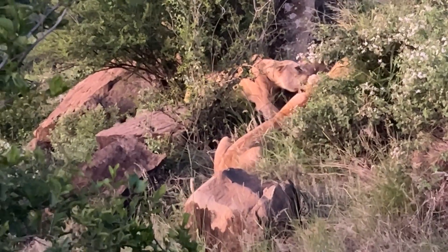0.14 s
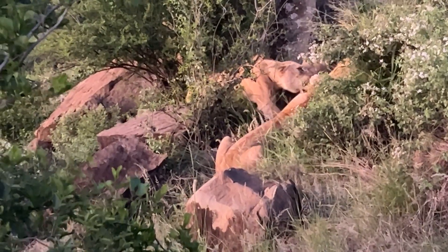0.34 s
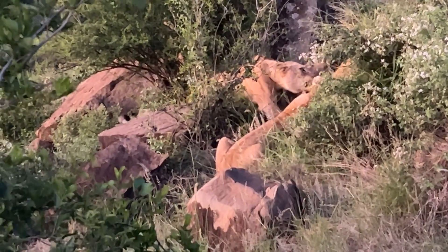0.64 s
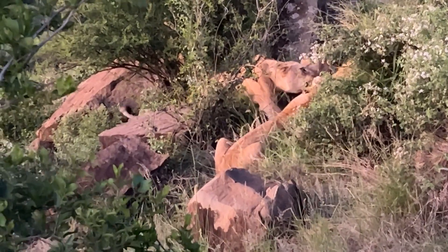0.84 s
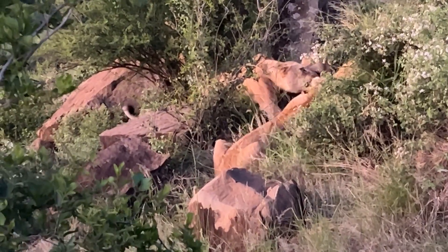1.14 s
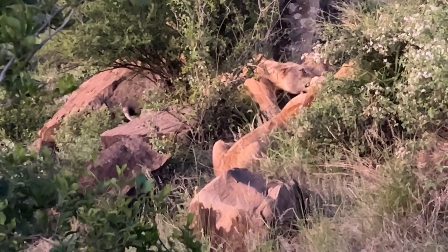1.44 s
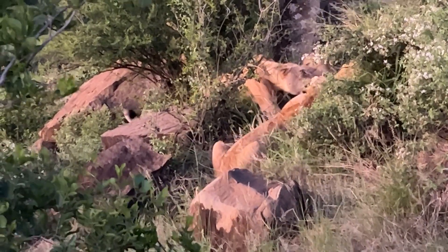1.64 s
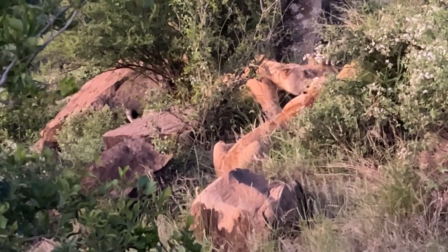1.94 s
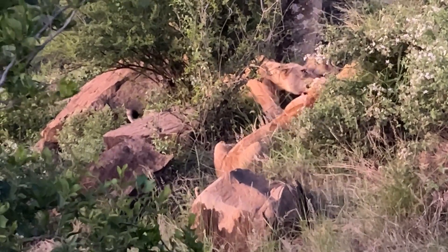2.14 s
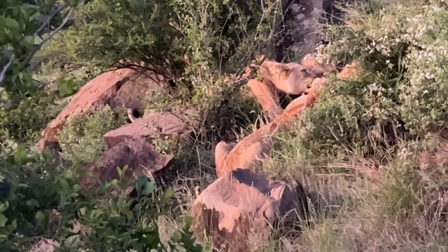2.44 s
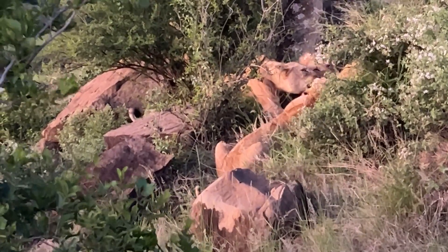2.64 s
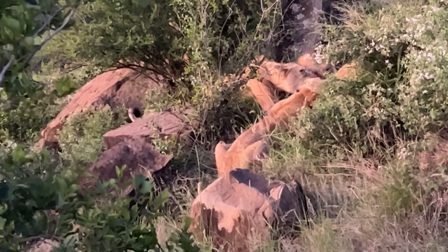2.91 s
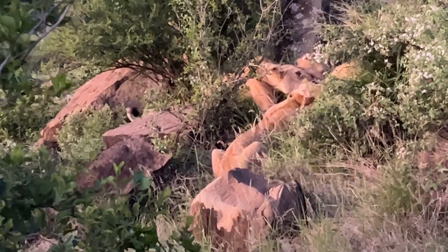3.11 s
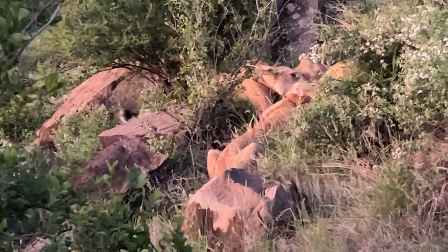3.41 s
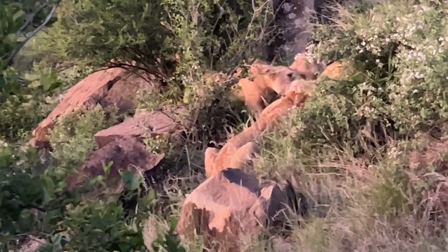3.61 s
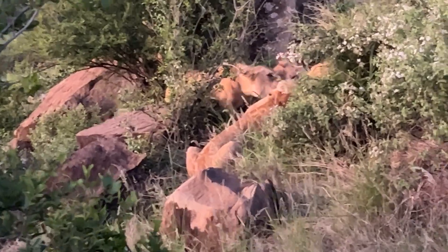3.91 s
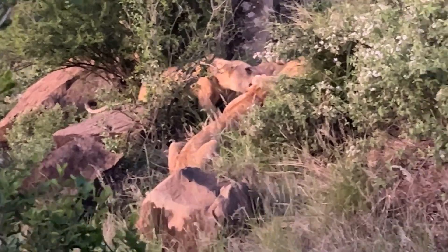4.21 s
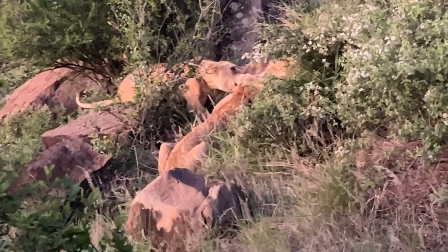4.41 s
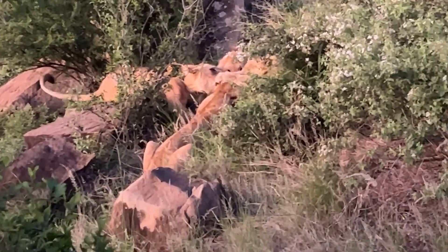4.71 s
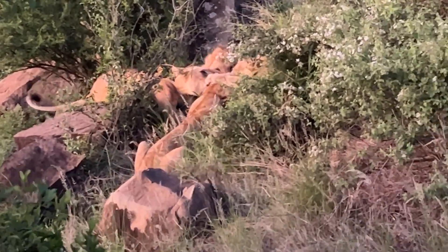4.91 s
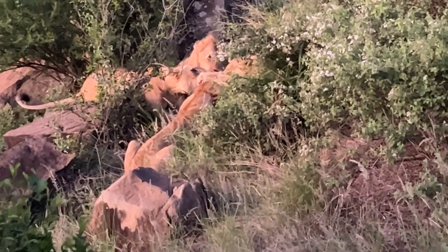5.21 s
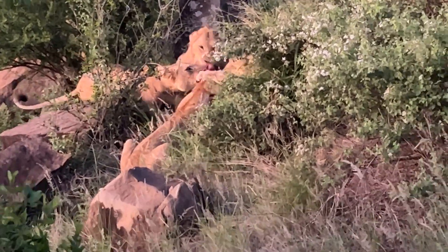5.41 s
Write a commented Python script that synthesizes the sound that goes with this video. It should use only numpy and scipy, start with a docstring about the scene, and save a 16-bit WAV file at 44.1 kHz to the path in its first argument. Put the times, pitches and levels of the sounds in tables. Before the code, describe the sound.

Overlapping big-cat growls, slow enough to hear the separate throat flaps, rumble from deep chests. Short snarls and hoarse moans break out as jaws open, with hissing pants and small twig snaps. After a short lull near two seconds the growling returns, peaks around 3.7 seconds and continues to the end. Outdoors, slight scattered echoes, very quiet insects and two faint bird whistles, picked up by a camera microphone some way off.

```python
"""Lions growl and snarl over a kill in the bush, some way from the microphone on a camera.
Slack vocal folds flap about thirty times a second; each flap rings the chest and, with jaws open, the mouth.
Folds in regular swing moan as harmonic stacks; rattles and knocks are short rings, and a paw lands with a low push.
The cats pant in shaped noise and twigs snap in noise bursts, with scattered echoes of the near sounds.
Behind them a cicada clicks, a bird whistles faintly, and noise makes the insect chorus and a light breeze."""
import sys
import numpy as np
from scipy import signal
from scipy.fft import rfft, irfft, next_fast_len
from scipy.io import wavfile
from scipy.ndimage import uniform_filter1d

SR = 44100
rng = np.random.default_rng(int(sys.argv[2]) if len(sys.argv) > 2 else 0)


def transcribe(signal):
    """Save signal, clipped to [-1, 1], as a 16-bit WAV file at the path in sys.argv[1]."""
    frames = np.atleast_2d(signal).T
    limited = np.clip(frames, -1, 1)
    pcm = np.round(limited * 32767).astype(np.int16)
    wavfile.write(sys.argv[1], SR, pcm)


N = 244755
T = np.arange(N) / SR

# the steady growler's runs of even flaps: first t/s, last t/s, approximate rate/Hz, power share of uneven growlers/0-1
FLAP_RUNS = [(.017, .083, 45, .4), (.109, .134, 40, .3), (.1585, .2915, 37.6, .2), (.322, .35, 36, .3),
             (.389, .494, 38, .4), (.534, .714, 35, .4), (.753, .912, 31, .4), (.968, 1.018, 40, .2),
             (1.047, 1.294, 28, .04), (1.344, 1.508, 30, .4), (1.558, 1.64, 25, .3), (1.7, 1.866, 30, .15),
             (2.009, 2.091, 12, .5), (2.197, 2.262, 31, .4), (2.293, 2.4, 37, .3), (2.451, 2.584, 30, .3),
             (2.61, 2.878, 30, .1), (2.916, 3.22, 26, .03), (3.262, 3.49, 34, .2), (3.545, 3.849, 26, .35),
             (3.877, 4.059, 33, .4), (4.087, 4.192, 38, .3), (4.21, 4.378, 30, .3),
             (4.412, 4.752, 26.5, .12), (4.811, 4.916, 38, .3), (4.958, 5.072, 35, .3),
             (5.096, 5.162, 45, .3), (5.19, 5.412, 31.5, .25), (5.443, 5.534, 33, .2)]
# voiced moans: start t/s, end t/s, first f/Hz, last f/Hz, first level/dB, last level/dB,
# strength of every second pulse/0-1, brightness/dB per octave
VOICED_MOANS = [(1.328, 1.391, 113.5, 107.7, -29.5, -33.5, 0.73, -1),
                (2.432, 2.511, 111.3, 126.4, -39.5, -31, 0.85, -0.5),
                (3.16, 3.26, 84.8, 87, -36, -36.5, .85, -10.5),
                (3.471, 3.576, 103.3, 117, -37, -34.5, 0.81, 1),
                (3.592, 3.705, 109.9, 110.7, -28, -29.5, 0.82, 0.5),
                (3.705, 3.777, 85, 75.2, -17.5, -31.5, 0.92, 1.5)]


def amp(db):
    """Decibels to gain."""
    return 10 ** (np.asarray(db) / 20)


def unit(x, span=SR // 4):
    """Evens the slow level out to rms 1 over a running span of samples."""
    return x / np.sqrt(abs(uniform_filter1d(x ** 2, span)) + 1e-20)


def columns(rows):
    """Each column of a curve table as a function of time."""
    s, *values = np.transpose(rows)
    return [np.interp(T, s, v) for v in values]


def read(points, hz):
    """A spectrum on a log-frequency axis."""
    f, value = np.transpose(points)
    return np.interp(np.log(hz + 1), np.log(f + 1), value)


def resonate(x, hz, width):
    """One complex pole at hz: a resonance of gain about 1."""
    r = np.exp(-np.pi * width / SR)
    pole = r * np.exp(2j * np.pi * hz / SR)
    return 2 * signal.lfilter([1 - r], [1, -pole], x).real


def formants(drive, modes):
    """A sum of steep resonances, each two poles in a row, evened out."""
    total = 0
    for hz, width, db in modes:
        ring = resonate(resonate(drive, hz, width), hz, 2.5 * width)
        total = total + amp(db) / np.sqrt(width) * ring
    return unit(total)


def noise(*spectra, patchy_db):
    """Random short-time spectra with drifting patches, scaled by the first spectrum alone."""
    hz = np.fft.rfftfreq(512, 1 / SR)
    real, imag, patches = rng.standard_normal((N // 128 + 5, 257, 3)).T
    patches = uniform_filter1d(uniform_filter1d(patches, 6, 0), 14, 1)  # across frequency, then time
    level_db = read(spectra[0], hz)[:, None] + patchy_db * patches / patches.std()
    z = (real + 1j * imag) * amp(level_db)
    scale = np.std(signal.istft(z, nperseg=512, noverlap=384)[1])
    for extra in spectra[1:]:
        z = z * amp(read(extra, hz)[:, None])
    return signal.istft(z, nperseg=512, noverlap=384)[1][:N] / scale


def stereo(mid, side):
    """Left and right from mid and side."""
    return np.array([mid + side, mid - side])


def swells(rows, edge_db, bend):
    """Gains of each column: every event swells to its crest and falls by edge_db at its ends; powers add."""
    t, rows = T[::44], np.array(rows)
    start, crest, end = rows[:, :3, None].transpose(1, 0, 2)
    away = np.where(t < crest, (crest - t) / (crest - start), (t - crest) / (end - crest))
    shape = amp(2 * np.maximum(edge_db * away ** bend, -120))
    power = amp(2 * rows[:, 3:]).T @ shape
    return np.array([np.interp(T, t, np.sqrt(p)) for p in power])


def lions():
    """Chest growl, and the same flaps and their puffs of air through throats and mouths."""
    # all chests together, one list a phrase: t/s, effort level/dB, upper chest ring level/dB (ahead of the hush)
    phrases = [
        [(0.0, -45, -27), (0.054, -29.5, -48), (0.092, -40, -39.5), (0.154, -31.5, -49), (0.198, -28, -31.5),
         (0.37, -37.5, -41)],
        [(0.39, -32, -34.5), (0.432, -28, -35), (0.468, -27.5, -34), (0.492, -30.5, -37), (0.624, -36, -40),
         (0.73, -37, -38.5)],
        [(0.74, -19.5, -40), (0.762, -18.5, -36), (0.804, -23.5, -33.5), (0.906, -34, -54), (0.912, -35, -62),
         (0.95, -30, -60)],
        [(0.96, -43, -49), (1.034, -29, -44), (1.088, -25, -49), (1.14, -28.5, -40), (1.158, -27, -45.5),
         (1.31, -35.5, -38)],
        [(1.33, -30, -30), (1.414, -32, -46), (1.44, -57, -33.5), (1.466, -30.5, -38), (1.758, -42.5, -33.5),
         (1.9, -48, -56.5)],
        [(1.92, -58.5, -64.5), (2.168, -53.5, -58), (2.172, -41, -53)],
        [(2.182, -34, -43.5), (2.324, -28.5, -44.5), (2.368, -37, -29.5), (2.414, -22.5, -35.5),
         (2.472, -56, -40), (2.5, -64, -41)],
        [(2.52, -32.5, -39), (2.566, -33, -45), (2.606, -27.5, -34.5), (2.8, -29, -42), (2.82, -28, -28),
         (2.87, -33, -36)],
        [(2.89, -33.5, -37.5), (3.056, -37, -48), (3.076, -34.5, -43), (3.184, -55, -41), (3.216, -35, -32),
         (3.27, -52, -51)],
        [(3.29, -50, -46), (3.314, -33, -37.5), (3.398, -30, -89), (3.438, -31, -31.5), (3.554, -36, -40),
         (3.58, -52, -48)],
        [(3.6, -38, -45), (3.62, -32, -39), (3.746, -33.5, -30), (3.83, -31, -34), (3.882, -23, -33.5),
         (4.03, -35, -36.5)],
        [(4.05, -26, -42), (4.08, -27, -28.5), (4.224, -31, -38.5), (4.262, -29.5, -30), (4.384, -39, -39.5),
         (4.4, -22.5, -33)],
        [(4.41, -31.5, -36), (4.454, -28.5, -35.5), (4.494, -38, -37.5), (4.518, -29.5, -37), (4.634, -38, -39),
         (4.76, -31.5, -38.5)],
        [(4.78, -32.5, -42), (4.838, -30, -36.5), (4.898, -38, -48), (4.932, -38, -54), (4.954, -37.5, -50.5),
         (5.06, -36, -44.5)],
        [(5.08, -41, -37), (5.116, -29.5, -38.5), (5.35, -32, -39), (5.376, -43, -60), (5.438, -22, -37.5),
         (5.55, -31, -39)],
    ]
    # size of the chest that leads: t/s, nominal f/Hz, ring decay/s (the other cats ring shorter)
    chest_sizes = [(0, 89.5, 0.029), (.9, 93.8, 0.016), (1.1, 104.7, .012), (1.75, 99.4, 0.014),
                   (2.0, 87, 0.018), (2.3, 96, 0.01), (2.7, 101.7, 0.012), (2.95, 103, 0.0036),
                   (3.2, 115, 0.0028), (3.45, 107.5, 0.015), (3.85, 98.5, 0.014), (4.35, 99, 0.014),
                   (4.5, 108, 0.0043), (4.8, 96, 0.019), (5.0, 87.5, 0.0074), (5.55, 88.7, .011)]
    # jaws open and close: start t/s, widest t/s, end t/s, throat level/dB, steady growler's muzzle level/dB,
    # snarlers' mouths level/dB, cheek level/dB
    jaw_moves = [(-.04, .03, .1, -43.5, -54, -44, -73), (.12, .24, .35, -41, -50.5, -51.5, -48),
                 (.36, .41, .5, -44.5, -60, -52, -59), (.52, .56, .63, -47, -48, -43.5, -58),
                 (.7, .78, .88, -48, -59, -52.5, -61), (.88, 1.04, 1.12, -55.5, -61, -63, -59),
                 (1.31, 1.35, 1.42, -34, -45.5, -41, -49), (1.42, 1.49, 1.62, -42, -75, -41.5, -45),
                 (1.63, 1.69, 1.78, -52, -62, -67, -60), (1.72, 1.8, 1.9, -57, -63, -76, -56.5),
                 (1.96, 2.02, 2.12, -59.5, -87, -61.5, -65.5), (2.172, 2.185, 2.28, -50.5, -79, -54, -56),
                 (2.26, 2.36, 2.58, -49, -61, -69, -53), (2.5, 2.62, 2.75, -46, -63, -67, -56),
                 (2.74, 2.81, 2.87, -40.5, -50, -58, -49.5), (2.888, 2.9, 2.96, -41.5, -51, -50.5, -58),
                 (3.14, 3.22, 3.28, -42, -59, -48, -58), (3.27, 3.36, 3.45, -45.5, -63, -55, -71),
                 (3.44, 3.5, 3.6, -39, -76, -38.5, -53), (3.58, 3.68, 3.79, -19.5, -42, -33.5, -47),
                 (3.78, 3.83, 4.04, -42, -51.5, -48.5, -46), (4.04, 4.1, 4.18, -41, -46, -70, -51),
                 (4.18, 4.26, 4.38, -37.5, -53, -63, -51), (4.38, 4.45, 4.6, -49, -55, -62.5, -67),
                 (4.48, 4.6, 4.95, -59.5, -63.5, -69, -62.5), (5.06, 5.09, 5.15, -41.5, -79, -55, -50),
                 (5.12, 5.27, 5.38, -45.5, -74, -45.5, -40.5), (5.38, 5.43, 5.56, -49, -55.5, -51, -49)]
    # throat, muzzle, mouths and cheek with jaws shut, relative to the effort: level/dB
    shut_db = [-40.5, -50, -58, -39.5]
    # single rings, the last of a half-shut mouth: f/Hz, width/Hz
    upper_ring, throat_ring, cheek_ring = (166.6, 35.3), (304, 23.8), (466, 126)
    # steady growler's muzzle and snarlers' mouths: f/Hz, width/Hz, relative level/dB
    muzzle_rings, mouth_rings = [(567, 10, -19), (795.4, 22, 4.5), (1097, 21, -2.5), (1815, 47, -14.5),
                                 (2600, 60, -37.5), (3840, 200, -16.5)], [(646, 71.5, 3.5), (1092, 8.2, -10.5), (1500, 34, -14.5),
                                                 (1810, 200, -14.5)]

    effort_db, upper_db = columns([row for phrase in phrases for row in phrase])
    hz, ring = columns(chest_sizes)
    jaws = swells(jaw_moves, edge_db=-20.5, bend=0.71)
    jaws = jaws + amp(effort_db + np.array(shut_db)[:, None])
    share = columns([(s, crowd) for a, b, _, crowd in FLAP_RUNS for s in (a, b)])[0]
    near_share, others_share = np.sqrt(1 - share), np.sqrt(share)

    steady, uneven = flap_times()
    steady_size = amp(1.67 * rng.standard_normal(len(steady)))
    uneven_size = amp(1.14 * rng.standard_normal(len(uneven)))
    near = unit(chest(steady, steady_size, hz, ring))
    others = unit(chest(uneven, uneven_size, hz, 0.38 * ring))

    flaps = np.zeros((2, N))
    for row, times, size in zip(flaps, (steady, uneven), (steady_size, uneven_size)):
        parting = ((times - .0105) * SR).astype(int)  # the folds part before the chest crests
        row[np.clip(parting, 0, N - 1)] = size
    both = near_share * flaps[0] + others_share * flaps[1]
    puff = signal.lfilter([1], [1, -np.exp(-1 / (0.013 * SR))], both)  # air escapes after each flap
    air = unit((puff + 1.4) * rng.standard_normal(N))
    pulses, left = unit(both), hush()

    upper = formants(pulses + 0.85 * air, [(*upper_ring, 0)]) * left
    growl = amp(effort_db) * (near_share * near + others_share * others) + amp(upper_db) * upper
    throat = jaws[0] * formants(pulses + 1.45 * air, [(*throat_ring, 0)]) * left
    muzzle = jaws[1] * formants(unit(flaps[0]) + .12 * air, muzzle_rings)
    mouth = jaws[2] * formants(pulses + 1.9 * air, mouth_rings) * left
    mouth += jaws[3] * formants(pulses + 1.27 * air, [(*cheek_ring, 0)])

    # left and right gains in dB place each part
    voices = growl * amp([[.35], [-.35]]) + throat * amp([[1.4], [-1.4]])
    voices = voices + muzzle * amp([[1.2], [-1.2]]) + mouth * amp([[-1.6], [1.6]])
    return voices, puff


def flap_times():
    """Moments of the steady growler's flaps, and of the uneven flaps of the others."""
    steady = [np.linspace(a, b, round((b - a) * rate) + 1) for a, b, rate, _ in FLAP_RUNS]
    gaps = .024 * np.exp(.4 * rng.standard_normal(400))  # seconds
    uneven = np.cumsum(gaps)
    return np.concatenate(steady), uneven[uneven < T[-1]]


def chest(times, size, hz, ring, rise=0.012, sag=0.94, sag_s=0.0062):
    """Each flap swells for a moment and dies while its pitch sags."""
    out, t = np.zeros(N + SR), np.arange(SR // 10) / SR
    for s, a in zip(times, size):
        i = int(s * SR)
        turns = np.cumsum(hz[i] * (0.88 + sag * np.exp(-t / sag_s))) / SR
        shape = np.minimum(t / rise, 1) ** 2 * np.exp(-np.maximum(t - rise, 0) / abs(ring[i]))
        shape = np.convolve(shape, np.hanning(200) / 100)[100:100 + len(t)]  # rounds the crest
        phase = 2 * np.pi * (turns - np.interp(rise, t, turns)) - 1.1  # the same at every crest
        out[i:i + len(t)] += a * shape * np.cos(phase)
    lead = int(rise * SR)  # the times mark the crest
    return out[lead:lead + N]


def hush():
    """Share of flapping left in throat and mouth: a moaning cat's folds do not flap."""
    moaning = sum((T > start + .01) & (T < end - .015) for start, end, *_ in VOICED_MOANS) > 0
    return 1 - .92 * uniform_filter1d(moaning * 1., 600)


def moans():
    """Folds in regular swing: a harmonic stack, with half-way lines where every second pulse is weak."""
    # tone of the moaning voice: f/Hz, level/dB
    tone = [(80, -3.5), (165, 15), (220, 3.5), (330, 3.5), (440, -24), (660, -10), (900, -31.5),
            (1110, -17), (1280, -50), (1450, -35.5), (1890, -26.5), (2300, -59)]
    rise_s, fall_s, edge_db = 0.016, 0.017, -20.5
    out = np.zeros(N)
    for start, end, hz0, hz1, db0, db1, second, bright_db in VOICED_MOANS:
        on = (T > start) & (T < end)
        t, u = T[on], np.linspace(0, 1, on.sum())
        edge = np.maximum(1 - (t - start) / rise_s, 0) + np.maximum(1 - (end - t) / fall_s, 0)
        wander = 1 + .2 * uniform_filter1d(rng.standard_normal(on.sum()), 300)
        hz = (hz0 + (hz1 - hz0) * u) * wander
        k = np.arange(2, 50)[:, None] / 2  # harmonics and the lines half-way between
        weakness = 1 - np.clip(second, 0, 1)
        height = amp(read(tone, k * hz) + bright_db * np.log2(k)) * np.where(k % 1, weakness, 1)
        turns = k * np.cumsum(hz) / SR + 0.59 * rng.random(k.shape)
        stack = (height * np.cos(2 * np.pi * turns)).sum(0)
        level = amp(db0 + (db1 - db0) * u + edge_db * edge) * signal.windows.tukey(on.sum(), .06)
        out[on] += level * stack / np.sqrt((height ** 2).sum(0) / 2)
    return out * amp([[1.2], [-1.2]])


def rattles(rasp):
    """Each wet rattle is a knock and a short spit of noise in one ring of the airway."""
    # the loudest rattles in the throat: t/s, level/dB (ahead of the band filter), ring f/Hz
    loudest = [(0.5135, -45, 1220), (.7371, -35, 1330), (.831, -40, 1570), (1.4619, -40.5, 1450),
               (2.2075, -42.5, 2460), (2.279, -42.5, 2160), (2.3031, -39, 1640), (2.3261, -38, 2480),
               (2.423, -39.5, 1645), (2.8981, -40, 1620), (3.277, -39.5, 1636), (3.303, -39, 1800),
               (3.366, -33, 1614), (3.394, -40, 1550), (3.422, -39.5, 1810), (3.4455, -39.5, 1410),
               (3.5074, -39, 1470), (3.6388, -38.5, 1840), (3.6722, -36.5, 1750), (3.696, -29.5, 1415),
               (3.8477, -40, 1530), (3.8845, -37.5, 1264), (4.096, -40, 2750), (4.256, -42, 1290),
               (4.705, -45.5, 1030), (5.155, -37.5, 1296), (5.229, -31, 1300), (5.258, -37, 1350),
               (5.317, -38, 1710)]
    t60, faint_per_s, faint_db = .038, 15, 10  # faint ones come by chance, 2 to 10 dB over the rasp
    out, t = np.zeros(N + SR), np.arange(SR // 12) / SR
    when, size, ring = rng.random((round(faint_per_s * T[-1]), 3)).T
    when = when * T[-1]
    chance_db = 20 * np.log10(rasp[(when * SR).astype(int)]) + faint_db - 8 * size
    faint = list(zip(when, chance_db, 1150 + 500 * ring))
    for s, peak_db, hz in loudest + faint:
        spit = rng.standard_normal(len(t))
        wobble = 1 + 0.26 * uniform_filter1d(spit, 40) * np.sqrt(40)
        ringing = wobble * np.sin(2 * np.pi * hz * t) + .5 * spit
        level = amp(peak_db - 60 * t / t60) * np.minimum(t / 0.0024, 1)
        out[int(s * SR):int(s * SR) + len(t)] += level * ringing
    band = signal.butter(2, [800, 3600], "bandpass", fs=SR, output="sos")
    return signal.sosfilt(band, out[:N])


def knocks():
    """A hard flap with the mouth open rings it and, weaker, two higher resonances."""
    # hard flaps: first t/s, level/dB at the onset of the decay, ring f/Hz, number of flaps
    hard_flaps = [(.148, -41, 850, 6), (.418, -41.5, 735, 1), (.551, -50, 640, 1), (1.336, -32, 647, 2),
                  (1.457, -36, 700, 1), (1.686, -45, 817, 1), (1.755, -46.5, 820, 1), (1.822, -49, 804, 1),
                  (2.759, -45, 840, 1), (2.793, -40.5, 840, 1), (2.814, -39.5, 540, 2),
                  (2.898, -35, 990, 1), (3.183, -42.5, 866, 1), (3.475, -38, 632, 1), (3.597, -32, 706, 1),
                  (3.641, -24, 710, 1), (3.792, -37.5, 690, 1), (4.092, -36.5, 764, 1),
                  (4.227, -43, 830, 1), (5.085, -35.5, 587, 1)]
    gap_s, t60 = .0262, 0.047
    out, t = np.zeros(N + SR), np.arange(SR // 8) / SR
    for first, peak_db, hz, flaps in hard_flaps:
        ringing = np.sin(2 * np.pi * hz * t) + 0.29 * np.sin(2 * np.pi * 1140 * t)
        ringing += 0.22 * np.sin(2 * np.pi * 1700 * t) * np.exp(-t / 0.0024)
        level = amp(peak_db - 60 * t / t60) * np.minimum(t / 0.0023, 1)
        for s in first + gap_s * np.arange(round(flaps)):
            out[int(s * SR):int(s * SR) + len(t)] += level * ringing
    return out[:N]


def slap():
    """A paw lands: a low push with a short ring and a sagging pitch."""
    # the landing: t/s, level/dB, nominal f/Hz, ring decay/s
    s, peak_db, hz, ring = (.7497, -15, 115, .012)
    return chest([s], [amp(peak_db)], np.full(N, hz), np.full(N, ring), rise=0.0073, sag=0.57)


def breath():
    """Gains of rasp, hiss and palate, swelling with every breath over a calm floor."""
    # breaths: start t/s, strongest t/s, end t/s, rasp in the throat level/dB, hiss at the teeth level/dB,
    # ring behind the palate level/dB
    breaths = [(-.05, .03, .16, -53.5, -58, -60), (.38, .46, .6, -54.5, -79, -63),
               (.45, .57, .7, -51, -68, -57), (.58, .68, .73, -53.5, -71, -59.5),
               (.725, .745, .79, -42.5, -61, -64), (.79, .95, 1.15, -52, -57.5, -61),
               (1.35, 1.37, 1.42, -56, -71, -60.5), (1.39, 1.5, 1.64, -51.5, -61, -56.5),
               (1.97, 2.03, 2.12, -79, -87, -74), (2.175, 2.21, 2.3, -56, -82, -67),
               (2.2, 2.34, 2.5, -50.5, -66.5, -54.5), (2.35, 2.52, 2.65, -52.5, -60.5, -59),
               (2.55, 2.7, 2.84, -59, -68, -62), (2.888, 2.9, 2.96, -50, -68, -79),
               (3.15, 3.17, 3.24, -61.5, -87, -85), (3.24, 3.36, 3.6, -52.5, -71, -56),
               (3.6, 3.72, 3.79, -55, -57.5, -62), (3.78, 4.0, 4.25, -50.5, -55, -56.5),
               (4.22, 4.34, 4.5, -63.5, -78, -88), (4.45, 4.8, 4.89, -62.5, -70, -67),
               (4.89, 4.94, 5.0, -64.5, -67, -64), (5.07, 5.15, 5.22, -60, -65, -62),
               (5.12, 5.27, 5.42, -48, -61, -53.5), (5.4, 5.52, 5.7, -59, -58.5, -64)]
    # rasp, hiss and palate between breaths: level/dB
    calm_db = [-76, -80, -102.5]
    return swells(breaths, edge_db=-17, bend=1.03) + amp(calm_db)[:, None]


def panting(puff, gains):
    """Rasping and hissing breath as shaped noise, rasp and palate fluttering with the flaps."""
    # spectra of throat rasp and teeth hiss: f/Hz, relative level/dB per Hz
    rasp_shape, hiss_shape = [(210, -15), (350, 4), (402, -26), (452, 13), (694, -3.5), (868, 4.5),
                              (1330, -4.5), (1960, 0.5), (2550, -10.5), (4500, -21), (5850, -77),
                              (9900, -120)], [(1470, -40), (2500, -20), (2780, 6), (8610, -6), (9150, -24.5),
                                            (9370, -65), (10500, -68.5), (10800, -20), (11400, -6),
                                            (15500, -8.5)]
    # width of the hiss: f/Hz, side over mid level/dB
    hiss_width = [(2500, 0), (6000, -22.5), (9000, -1), (10000, 16.5), (11000, 17), (12500, -15.5)]
    # low and high rings of the rasp: f/Hz, width/Hz, relative level/dB
    airway_rings, palate_rings = [(1332, 320, 10), (1676, 130, -2)], [(2504, 270, 6.5), (2750, 200, 3.5)]
    flutter = unit(.7 + uniform_filter1d(puff, 40))
    rasp = noise(rasp_shape, patchy_db=3.0)
    rasp_side = amp(-9.5) * noise(rasp_shape, patchy_db=5.5)
    rasp = stereo(rasp + .5 * formants(rasp, airway_rings), rasp_side)
    palate = formants(rng.standard_normal(N), palate_rings)
    hiss = stereo(noise(hiss_shape, patchy_db=3.5), noise(hiss_shape, hiss_width, patchy_db=2.0))
    return flutter * (gains[0] * rasp + gains[2] * palate) + gains[1] * hiss


def snaps():
    """Twigs and snorts: short noise bursts, a dull part and a bright part."""
    # bursts: t/s, dull level/dB and bright level/dB (ahead of the band filters), t60/s after the hold,
    # left over right level/dB, hold/s, treble centre f/Hz
    bursts = [(0.729, -43.5, -45, 0.083, 14.5, 0.015, 5560), (1.912, -62, -65, .02, 3, .001, 12000),
              (2.176, -67, -74, .03, 4, 0.0015, 6000), (2.704, -51, -66, 0.16, 0, 0.0049, 6000),
              (2.816, -51, -61, 0.032, 7, 0.0026, 6500), (2.902, -65, -72, 0.054, 6, 0.015, 6000),
              (3.39, -58, -58, .02, 0, .001, 12500), (4.461, -35, -53, 0.023, 2, 0.00053, 11100),
              (5.086, -58, -68, 0.026, 1, 0.0019, 6000), (5.453, -39.5, -38.5, 0.011, 4, 0.00048, 13100)]
    out, t = np.zeros((2, N + SR)), np.arange(SR // 5) / SR
    dull = signal.butter(3, [700, 2800], "bandpass", fs=SR, output="sos")
    for s, dull_db, treble_db, t60, pan_db, hold, hz in bursts:
        bright = signal.butter(2, [.6 * hz, 1.35 * hz], "bandpass", fs=SR, output="sos")
        level = amp(-60 * np.maximum(t - hold, 0) / abs(t60)) * np.minimum(t / 0.00039, 1)
        burst = rng.standard_normal(len(t)) * level
        sound = amp(dull_db) * signal.sosfilt(dull, burst) + amp(treble_db) * signal.sosfilt(bright, burst)
        out[:, int(s * SR):int(s * SR) + len(t)] += sound * amp([[pan_db / 2], [-pan_db / 2]])
    return out[:, :N]


def rocks(x):
    """A short scatter of echoes from rocks and trunks, other taps for each side."""
    t = np.arange(SR // 5) / SR
    chosen = rng.random((2, len(t))) < 1500 / SR  # about 1500 echoes a second
    taps = rng.standard_normal((2, len(t))) * chosen * amp(-60 * t / 0.17) * (t > .004)
    taps = taps / np.linalg.norm(taps, axis=1, keepdims=True)
    return signal.fftconvolve(x, taps, axes=1)[:, :N]


def cicada():
    """Tymbal clicks at a slightly wavering rate, throbbing, rung in the insect's body."""
    # song: t/s, level/dB (ahead of the left and right gains)
    song_level = [(0, -79.5), (1.2, -84), (1.55, -78), (1.75, -72), (2.15, -83), (2.7, -78), (3.1, -68),
                  (3.4, -71.5), (3.7, -76), (4.2, -79), (5.55, -74)]
    # body rings: f/Hz, width/Hz, relative level/dB
    body_rings = [(6790, 280, 4.5), (7710, 200, -11.5), (8120, 160, 2), (8313, 130, 0.5)]
    click_hz, throb_hz = 442.0, 107.3
    drift = uniform_filter1d(uniform_filter1d(rng.standard_normal(N), 3000), 3000)
    waver = 1 + 0.00089 * unit(drift, SR)
    turns = np.cumsum(click_hz * waver) / SR
    clicks = sum(np.cos(2 * np.pi * k * turns) for k in range(16, 20))  # only the harmonics near the rings
    clicks = clicks * (1 + 0.52 * np.cos(2 * np.pi * throb_hz * T))
    song = sum(amp(db) * resonate(resonate(clicks, hz, w), hz, w) for hz, w, db in body_rings)
    return amp(columns(song_level)[0]) * unit(song) * amp([[1.5], [-3]])


def bird():
    """Faint rising whistles: gliding sines."""
    # one list a whistle: t/s, f/Hz, rms level/dB
    whistles = [
        [(2.75, 3000, -75), (2.79, 3140, -70), (2.84, 3160, -79)],
        [(3.0, 2710, -82), (3.05, 2800, -67), (3.1, 2920, -78)],
    ]
    out = np.zeros(N)
    for rows in whistles:
        hz, level_db = columns(rows)
        start, end = rows[0][0], rows[-1][0]
        on = np.interp(T, [start, start + .012, end - .012, end], [0, 1, 1, 0])
        out += np.sqrt(2) * amp(level_db) * on * np.sin(2 * np.pi * np.cumsum(hz) / SR)
    return out


def bush():
    """Distant insect chorus and air, as shaped noise in mid and side."""
    # spectra of mid and side: f/Hz, relative level/dB per Hz
    mid_shape, side_shape = [(150, -24), (250, 7), (466, -29.5), (837, -24.5), (995, -31), (1410, -27),
                             (4390, -29), (5500, -6.5), (6210, -27.5), (8180, -17.5), (9230, -27.5),
                             (9720, -65), (11800, -29), (14000, -38.5), (15500, -57)], [(35, -24), (60, 19), (112, -37.5), (145, -7.5), (272, -20.5),
                                           (403, -14.5), (721, -47), (810, -13.5), (1170, -31),
                                           (1550, -23.5), (2010, -47), (3760, -38), (5580, -19.5),
                                           (10900, -41), (15500, -70.5)]
    mid_db, side_db = -63, -66
    mid = amp(mid_db) * noise(mid_shape, patchy_db=1.0)
    return stereo(mid, amp(side_db) * noise(side_shape, patchy_db=4.5))


def wind():
    """A light breeze rumbles on the microphone: slow noise, mostly alike in both channels."""
    band = signal.butter(3, [28, 65], "bandpass", fs=SR, output="sos")
    slow = signal.sosfilt(band, rng.standard_normal((2, N)))
    mid_db = -57  # rms ahead of the bass roll-off
    return amp(mid_db) * stereo(unit(slow[0], SR), .25 * unit(slow[1], SR))


def ports(x):
    """The camera body shades and delays the two microphone ports differently."""
    # phase: f/Hz, left lead/rad
    lead = [(60, .02), (250, .03), (400, -.25), (700, -.05), (1000, -.3), (1450, -.42), (1800, 0),
            (2350, .58), (3200, .68), (4400, .5), (5150, 1.4), (6000, .1), (7000, -.6), (8400, -1.3),
            (9500, 0), (15000, -.15)]
    # balance: f/Hz, left over right level/dB
    balance = [(40, 0.5), (150, -0.9), (600, 1.2), (1400, -0.3), (2300, 0.7), (3300, 0.7), (5000, 5.5),
               (7000, 2.5), (9000, -2.7), (15000, 2.5)]
    size = next_fast_len(N + 2048)
    hz = np.fft.rfftfreq(size, 1 / SR)
    half = amp(read(balance, hz) / 2) * np.exp(.5j * read(lead, hz))  # half on each port
    return irfft(rfft(x, size) * np.array([half, 1 / half]), size)[:, :N]


def scene():
    """All sources, left and right."""
    voices, puff = lions()
    gains = breath()
    cats = voices + moans() + rattles(gains[0]) + knocks() + slap()
    close = cats + snaps()
    echoes = amp(-16.5) * rocks(close)
    return close + echoes + panting(puff, gains) + cicada() + bird() + bush() + wind()


def record(dry):
    """Port pair and bass roll-off of the microphone, then the band limit."""
    bass_hz, edge_hz = 40, 15650
    roll_off = signal.butter(4, bass_hz, "highpass", fs=SR, output="sos")
    thinned = signal.sosfilt(roll_off, ports(dry))
    limit = signal.firwin(2047, edge_hz, window=("kaiser", 12), fs=SR)
    return signal.oaconvolve(thinned, limit[None], "same")


dry = scene()
out = record(dry)
transcribe(out)
```